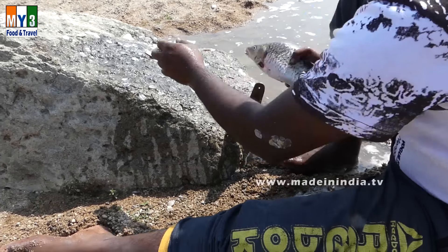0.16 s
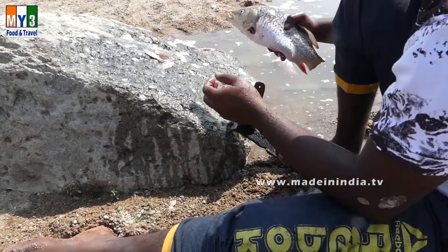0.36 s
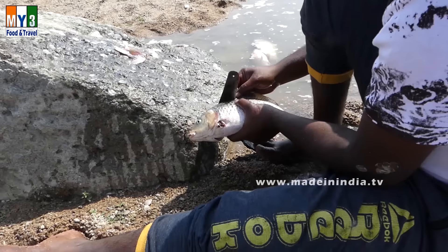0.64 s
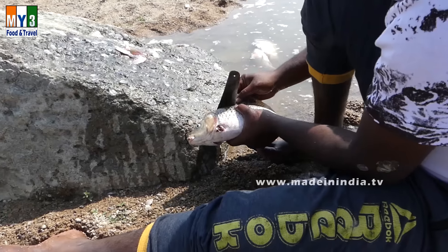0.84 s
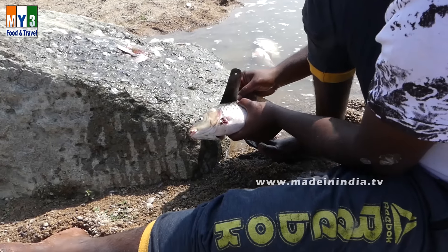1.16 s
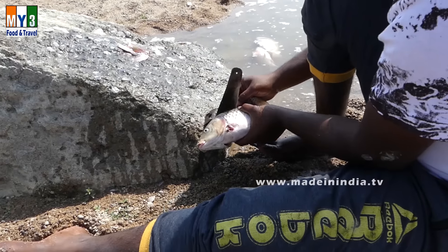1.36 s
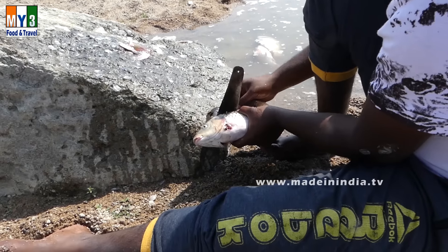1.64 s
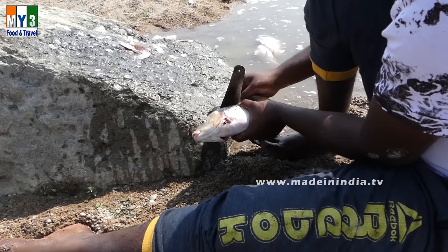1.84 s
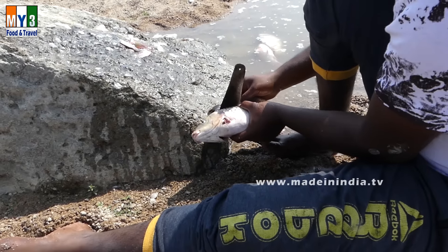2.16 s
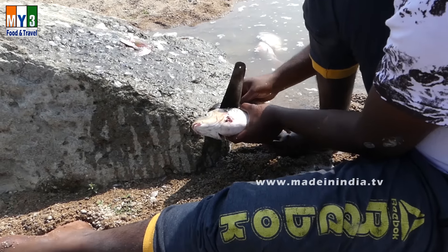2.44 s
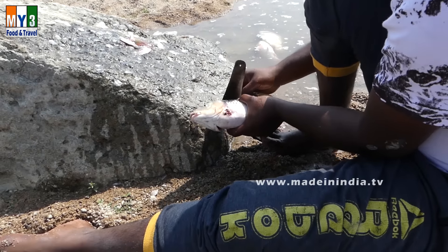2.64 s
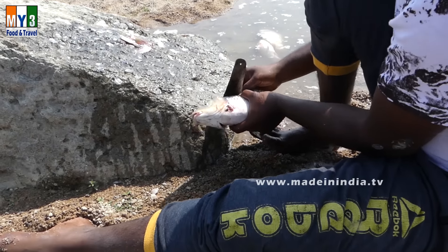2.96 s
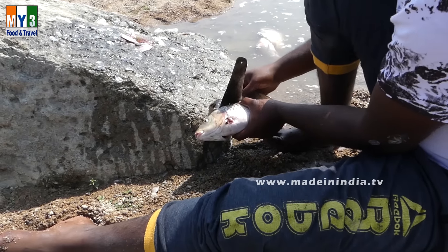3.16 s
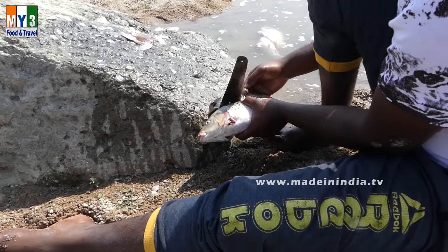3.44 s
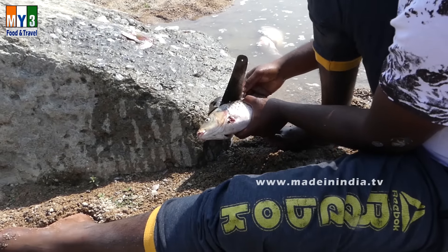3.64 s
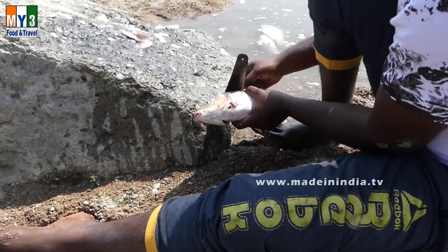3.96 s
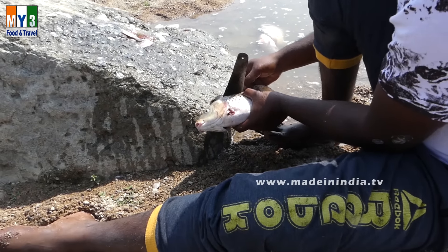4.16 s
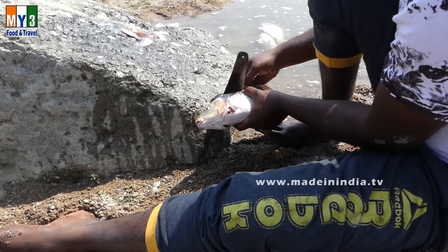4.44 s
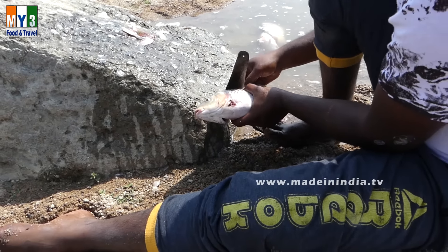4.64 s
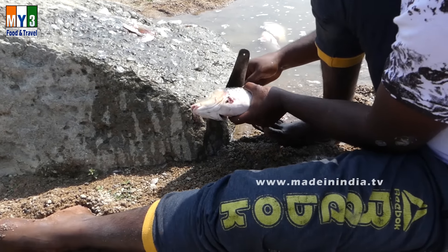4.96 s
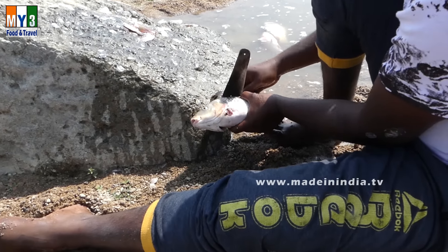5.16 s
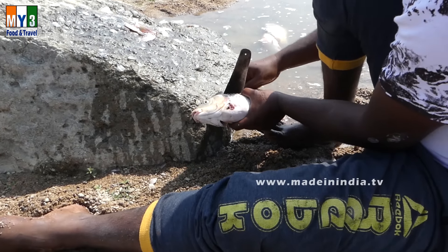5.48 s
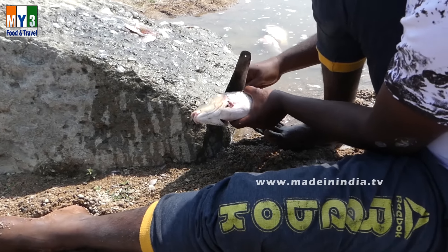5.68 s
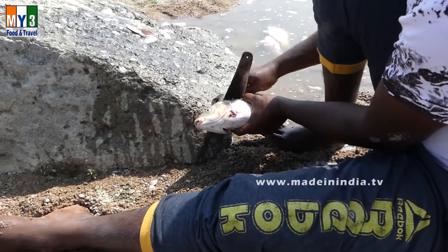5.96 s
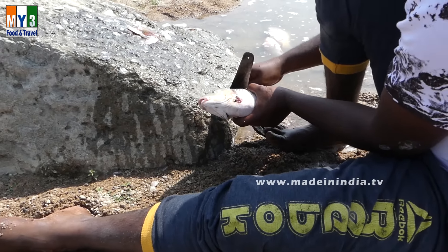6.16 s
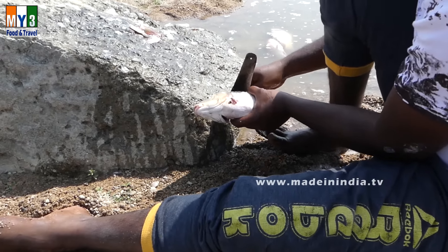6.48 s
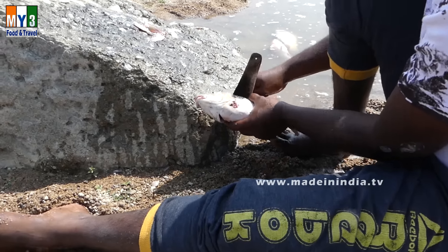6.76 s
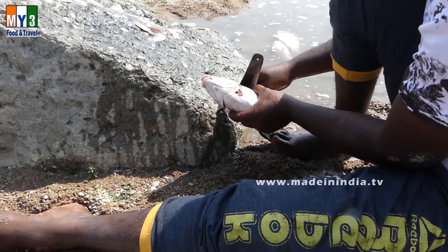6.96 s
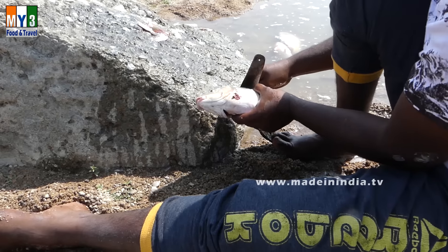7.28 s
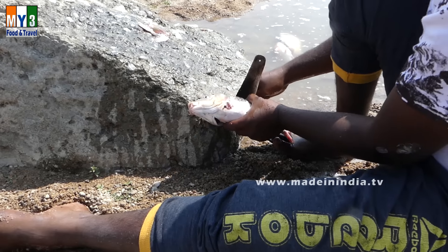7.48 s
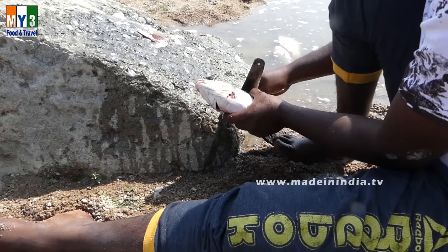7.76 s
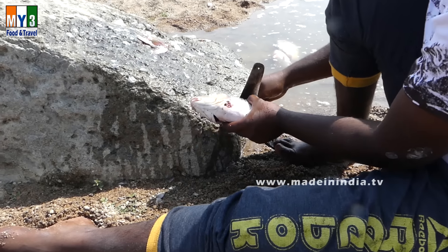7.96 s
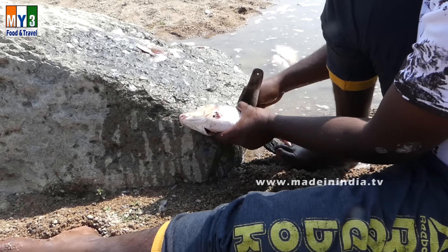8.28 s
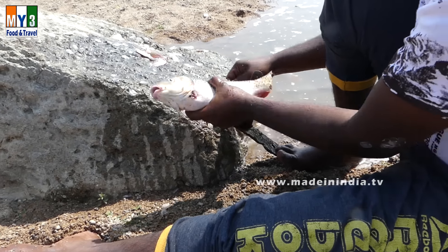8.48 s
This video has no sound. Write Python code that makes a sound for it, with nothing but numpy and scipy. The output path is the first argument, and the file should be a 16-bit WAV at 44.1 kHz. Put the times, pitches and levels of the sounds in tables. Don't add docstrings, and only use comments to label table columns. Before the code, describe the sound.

Outdoors, a low, distant engine throbs steadily under soft air hiss, with faint bird chirps clustered in the first half second and thin rising whistles around 3.5. Close to the microphone, a fish is scraped on steel. From 0 to 1.4 there are only light grazes and a few soft, gritty strokes. From 1.5 to 3.2 dry rasps come about five a second, with brittle scale snaps and small wet pops near 2.1 and 2.4. From 3.2 to 4.7 it is nearly quiet, just faint grazes. Regular scraping returns from 4.8 to 7.3, with more ticks and smacks and a brighter scrape at 7.15. A hard cracking cluster hits at 7.5, another at 7.9, and the loudest at 8.25 to 8.4, with fleshy thuds, a wet smack, a soft low foot slip and brief metallic rings. Rock and ground add a very short echo; a light graze ends it at 8.5.

```python
import sys
import numpy as np
from scipy import signal
from scipy.fft import rfft, irfft, next_fast_len
from scipy.io import wavfile
from scipy.ndimage import uniform_filter1d, map_coordinates

SR = 44100
rng = np.random.default_rng(int(sys.argv[2]) if len(sys.argv) > 2 else 0)


def ratio(d):
    e = np.asarray(d, float) / 20
    return 10 ** e


def store_wav(level_fs):
    pcm = np.round(np.clip(np.atleast_2d(level_fs), -1, 1) * 32767)
    wavfile.write(sys.argv[1], SR, pcm.T.astype(np.int16))


N = 379693
T = np.arange(N) / SR

# time in seconds, engine casing in dB, air in dB.
FAR_LEVELS = [(0.0, -66, -59), (0.84, -60.5, -60.5), (1.7, -63.5, -60), (2.68, -63, -58.5),
              (4.56, -65, -61.5), (5.23, -61.5, -60.5), (8.06, -65, -58), (8.61, -61, -59)]
# frequency in Hz, level in dB per Hz.
ENGINE_TONE = [(15, -77), (25, -80), (70, -14), (78, -15), (108, -3.5), (216, -9.5), (249, -10),
               (281, -11.5), (408, -19.5), (472, -21), (600, -37), (780, -77), (1320, -120)]
# frequency in Hz, level in dB per Hz.
CASING_TONE = [(500, -30), (690, -5.0), (780, -5), (900, -5.0), (1000, -46), (1300, -34)]
# frequency in Hz, level in dB per Hz.
AIR_TONE = [(120, -25), (200, 0.5), (227, -13.5), (249, -15.5), (278, -9), (416, -7.5), (577, -14.5),
            (848, -14), (2230, -22.5), (2490, -22), (3870, -27), (5090, -27), (15800, -33)]
# frequency in Hz, likeness from -1 to 1.
LIKENESS = [(35, .1), (70, 0.54), (130, 0.78), (290, -0.36), (640, -0.41), (1410, -0.23), (3100, 0.21),
            (6820, 0.63), (15000, 0.51)]
# start in seconds, length in seconds, first pitch in Hz, last pitch in Hz, level in dB.
BIRD_NOTES = [
    (.54, .36, 1000, 1255, -64.5),
    (3.5, .6, 3350, 3530, -66),
    (3.56, .42, 2830, 2890, -70),
    (3.55, .5, 4430, 4510, -74),
    (.1, .1, 1950, 1850, -65),
    (3.44, .13, 3080, 2990, -69),
    (2.57, .14, 3000, 2960, -68),
    (8.11, .08, 3000, 3100, -66),
    (4.03, .15, 3520, 3480, -72),
    (3.2, .12, 3000, 3020, -71),
]
# time in seconds, pitch in Hz, level in dB, sweep in Hz per second,
# half length in seconds.
CHIRPS = [(.305, 3480, -64, 0, .012), (.415, 3570, -64, 3000, .012), (.465, 2780, -63, -12000, .01),
          (.49, 3720, -66, 0, .01), (.425, 4120, -67, 5000, .01), (0.17, 1780, -61, -5000, .01),
          (.345, 1850, -66, 3000, .02), (5.528, 4350, -57, 80000, .009), (5.537, 4900, -60, 8000, .005),
          (3.985, 3220, -63, 10500, .035), (3.7, 3430, -63, -6000, .015), (3.775, 3200, -67, -6000, .012),
          (4.05, 4400, -68, 0, .025), (.065, 3200, -68, 0, .012), (0.15, 3080, -68, 0, .01),
          (.12, 3800, -67, 0, .01), (0.33, 3280, -71, 2000, .025), (.27, 1350, -66, 1000, .03),
          (.38, 1250, -66, -2000, .02), (.31, 2150, -68, 0, .012)]

# time in seconds, peak in dB, pitch in Hz.
SMACKS = [(2.1211, -34.5, 1640), (2.366, -37, 800), (5.2714, -39.5, 1640), (5.624, -35, 1650),
          (6.4434, -37, 1630), (6.945, -37, 800), (7.061, -41, 1670), (7.195, -30, 1650),
          (7.466, -42, 1450), (7.573, -38, 1510), (8.325, -27.5, 1660)]
# time in seconds, peak in dB.
FOOT_SLIPS = [
    (8.29, -36.5),
    (8.41, -43),
    (8.15, -47),
]

# frequency in Hz, width in Hz, height over the broad colour in dB.
BODY_MODES = [(572, 350, 8), (827, 85, 10)]
# frequency in Hz, width in Hz, height over the broad colour in dB.
BLADE_MODES = [(2330, 770, 3.5), (3093, 33, 0.76), (4610, 210, 3.5), (5460, 840, 4.7), (6320, 310, 2),
               (7350, 130, 4), (9520, 44, 3), (9750, 64, 4), (11000, 130, 4.5), (11680, 120, 6),
               (14400, 300, 6.3)]
# frequency in Hz, level in dB per Hz.
BODY_TONE = [(200, -35), (380, -3.5), (450, -0.5), (900, -4.5), (1200, -3), (1800, -27), (5000, -41)]
# frequency in Hz, level in dB per Hz.
FLEX_TONE = [(700, -39), (1100, 1.5), (2000, -1.5), (3300, -2.5), (4200, -12.5), (9000, -20.5)]
# frequency in Hz, level in dB per Hz.
FACE_TONE = [(100, -40), (350, -10), (2800, -10), (3800, 3), (6000, -3), (7400, -6), (9000, -17.5)]
# frequency in Hz, level in dB per Hz.
EDGE_TONE = [(100, -38), (400, -12), (3500, -9.5), (6500, -5.5), (8200, -2), (9500, 1.5), (12000, 0),
             (15000, -10), (16500, -24)]
# frequency in Hz, level in dB per Hz.
TIP_TONE = [(200, -45), (9000, -28.5), (10500, 1), (12000, 5.5), (14500, -3), (16000, -14)]

# start in seconds, length in seconds,
# rasp in dB, lean in dB.
STROKES = [(.546, .133, -78, -11), (.655, 0.16, -58, 1.5), (1.462, .07, -63, 6.5), (1.673, 0.11, -50, 3.5),
           (1.869, 0.083, -53.5, 0), (2.029, 0.09, -49, 3), (2.222, 0.092, -55, 3), (2.395, .088, -53, 3),
           (2.555, 0.1, -57, 5), (2.756, 0.078, -51.5, 1), (3.121, 0.095, -53, 3), (3.857, 0.26, -66.5, 0),
           (4.789, 0.11, -54, 2.5), (4.987, 0.12, -58, 4), (5.173, 0.1, -54, 3), (5.729, 0.11, -56.5, 3),
           (5.977, 0.076, -54, 0), (6.136, .093, -56.5, 2.5), (6.359, .087, -51, 2),
           (6.537, 0.08, -55.5, 2), (6.647, 0.24, -55, 2), (6.755, 0.068, -56, 7.5),
           (6.923, 0.098, -54, 4.5), (7.139, 0.044, -41, 1), (7.297, 0.099, -50, 5)]
# start in seconds, length in seconds,
# rasp in dB, lean in dB.
SWELLS = [
    (.965, 0.11, -57.5, 3),
    (1.173, 0.17, -53.5, 4),
    (2.905, 0.11, -58.5, 5),
    (5.371, 0.11, -58.5, 2.5),
    (5.553, 0.085, -54, 2),
    (7.68, 0.088, -49, 6),
]
# start in seconds, length in seconds, rasp in dB, lean in dB.
CUTS = [
    (7.485, .11, -42, 0.5),
    (7.891, 0.089, -44, 2),
    (8.045, 0.063, -44.5, 10.5),
    (8.085, 0.072, -53.5, 19),
    (8.196, .038, -61, 14),
    (8.238, 0.042, -37, 7.5),
    (8.276, 0.052, -38, 4.5),
    (8.321, 0.057, -49, -1),
    (8.398, 0.059, -46, 0),
]
# start in seconds, length in seconds, rasp in dB, lean in dB.
GRAZES = [(.02, 0.041, -62, -2), (.104, .036, -68, 3), (.782, 0.12, -65, 3), (.843, .025, -58.5, 9.5),
          (1.326, 0.031, -57, 16.5), (2.324, .075, -62, 6), (2.711, 0.021, -56, -6),
          (3.384, 0.071, -56.5, 4.5), (4.345, 0.09, -66, -4), (5.101, .051, -58, -5),
          (5.471, 0.1, -61.5, 1), (5.919, 0.068, -58.5, 1), (6.604, 0.068, -49, -0.5),
          (7.016, 0.065, -63, 5), (8.506, .032, -59, 0)]
# its table, share of the length spent rising,
# body and edge level against the rasp at no lean in dB.
CONTACT_KINDS = [
    (STROKES, 0.54, -.6),
    (SWELLS, 0.69, -0.75),
    (CUTS, .33, -7),
    (GRAZES, 0.38, -7),
]

# time in seconds, peak in dB, lean in dB.
ON_EDGE = [(.6938, -38, -8), (1.7444, -38, 0), (1.8711, -48, 6), (1.909, -37, -6), (1.921, -38, -17),
           (1.948, -41, -7), (2.805, -34, -3), (1.288, -48, 4), (2.817, -43, -4), (4.794, -51, -4),
           (5.0557, -43, 7), (5.622, -50, -6), (7.1486, -32, -1), (7.164, -40, -2), (7.5294, -28, 8),
           (7.533, -32, 12)]
# time in seconds, peak in dB, lean in dB.
ON_FACE = [(.861, -50, 2), (2.6958, -48, 4), (2.7122, -46, -9), (2.747, -41, 7), (2.7746, -42, -5),
           (4.756, -54, 2), (5.113, -48, -6), (5.124, -50, -4), (5.23, -48, 4), (5.3547, -42.5, 9),
           (5.4919, -48, 7), (5.8365, -48.5, 4), (6.0082, -47, 10), (6.02, -40, -10), (6.3723, -39, 6),
           (6.556, -49, 1), (6.6175, -41, -4), (6.6812, -43, 8), (6.7332, -39, -10), (7.0254, -49, 5),
           (7.4774, -56, 2), (7.4924, -50, 0), (7.9427, -31.5, -6), (7.953, -33.5, -6)]
# time in seconds, peak in dB, lean in dB.
BENDING = [(.0327, -47, -20.5), (.1151, -51.5, -2), (.5684, -52.5, 12), (.9787, -52, 0), (1.3444, -50, 8),
           (1.356, -45.5, 5), (1.6845, -52, 7), (1.708, -42, -6), (2.7227, -42.5, -10), (7.1914, -51, 12),
           (7.3281, -44, 15), (7.5094, -34, 0), (7.5461, -28, 7), (7.5707, -38, -11), (7.674, -53, 12),
           (7.6936, -39, 18), (7.768, -45, 12), (7.894, -31.5, 0), (7.9228, -21, 4.5), (8.0466, -47, -8),
           (8.0588, -34.5, 17.5), (8.2033, -42.5, 14), (8.2114, -41, 9), (8.2276, -34, 2),
           (8.2714, -35, -4), (8.3157, -33, -13), (8.4048, -42, 9)]
# time in seconds, peak in dB, lean in dB.
JOLTING_ALL = [(2.0917, -51, -7), (2.4274, -49.5, 12.5), (3.15, -51, -9), (4.8429, -59, -2),
               (5.182, -62, 7), (5.1987, -42, 7), (7.1583, -32, -1), (7.309, -47, 4), (7.5057, -26.5, -1),
               (7.5174, -38, -9), (7.9121, -23.5, -1), (8.2468, -20.5, -8.5), (8.2877, -26.5, 0),
               (8.2976, -22.5, 6), (8.4175, -36, 1)]
# its table, level into body, flex, face, edge and tip in dB,
# change of those five levels in dB for 1 dB of lean.
SNAP_KINDS = [
    (ON_EDGE, (-13, -38, -31, -2.5, 1.5), (0.77, 1, 1, 0.11, -0.32)),
    (ON_FACE, (-14, -26, 1.5, -8.5, -14), (1, 0.52, 0.14, -0.94, -.9)),
    (BENDING, (-7, 1.5, -26, -11.5, -16), (0.74, 0.14, 0.15, -0.89, -1.1)),
    (JOLTING_ALL, (-0.8, -3.5, -0.5, -0.5, -12), (0.92, -0.15, 0.63, -0.64, -.6)),
]

# frequency in Hz, level in dB, time to fall by 60 dB in seconds.
FREE_RING = [
    (3173, -15, 0.06),
    (4640, -20, 0.046),
    (6420, -22, .05),
    (7350, -28, 0.051),
    (9740, -19, .065),
]
# start in seconds, length in seconds,
# pitch in Hz, level in dB.
HELD_NOTES = [(0.68, .1, 2300, -64), (0.98, 0.11, 2040, -59.5), (0.98, .095, 5500, -63),
              (0.72, 0.12, 5400, -63), (.7, .08, 9450, -63), (.98, .09, 11100, -61), (.98, .09, 11700, -63),
              (.99, .08, 9600, -63), (1.18, .15, 4400, -64), (2.92, .04, 6300, -61), (7.14, .05, 4300, -49),
              (3.14, .05, 11700, -62), (1.22, .12, 1970, -58.5), (1.19, .13, 5400, -62),
              (1.27, .08, 2460, -60), (3.14, .07, 2100, -59), (5.56, .07, 2760, -59),
              (5.57, 0.065, 4800, -58), (7.15, 0.039, 2250, -49), (7.31, 0.086, 2100, -55),
              (7.7, .07, 2400, -54), (8.058, .04, 2600, -47), (8.095, 0.047, 2350, -50),
              (8.06, 0.083, 950, -46.5), (8.065, .03, 11400, -52.5), (6.6, .2, 5400, -59),
              (2.4, .08, 5500, -60)]
# time in seconds, pitch in Hz, level in dB,
# time to fall by 60 dB in seconds.
PINGS = [(8.2467, 9706, -31, .058), (8.2467, 8600, -38, .08), (8.2467, 2000, -34, .06),
         (7.5056, 2420, -33, .04), (7.953, 9550, -44, .05), (7.9228, 2514, -35, .05),
         (8.4174, 3170, -41, .06), (8.4174, 3700, -46, .04), (8.2976, 11050, -36, .03),
         (8.3157, 9400, -41, .06), (8.335, 1750, -40, .02), (5.325, 6450, -53, .04),
         (5.45, 4600, -48, 0.016), (5.462, 5500, -46, .015), (5.481, 5500, -51, .02),
         (8.1, 1500, -42, .012), (8.139, 1200, -44, .012), (7.581, 5500, -46, .012),
         (5.215, 11050, -47, .06), (5.11, 13500, -52, .04), (.862, 5100, -48, .015),
         (8.2976, 566, -32, .04), (7.193, 11000, -48, .012), (7.672, 11000, -50, .012)]


def unit(x):
    return x / np.sqrt(np.mean(x ** 2) + 1e-20)


def along(points, hz):
    f, v = np.transpose(points)
    return np.interp(np.log(hz + 1), np.log(f + 1), v, left=v[0], right=v[-1])


def wobble(rate):
    knots = rng.standard_normal(int(N * rate / SR) + 4)
    return map_coordinates(knots, [T * rate])


def filtered(x, response):
    m = next_fast_len(N + SR // 2)
    return irfft(rfft(x, m) * response(np.fft.rfftfreq(m, 1 / SR)), m)[..., :N]


def patches(x, patchy_db, tall, long):
    z = signal.stft(x, nperseg=512)[2]
    field = rng.standard_normal(z.shape[1:])
    field = uniform_filter1d(field, size=tall, axis=0)
    field = uniform_filter1d(field, size=long, axis=1)
    gain = ratio(patchy_db * unit(field))
    return signal.istft(z * unit(gain), nperseg=512)[1][:, :N]


def spread(pair, spectrum):
    def shares(hz):
        turn = np.arccos(np.clip(along(LIKENESS, hz), -1, 1)) / 2
        return ratio(along(spectrum, hz)) * [np.cos(turn), np.sin(turn)]

    mid, side = filtered(pair, shares)
    return unit(np.array([mid + side, mid - side]))


def air():
    noise = patches(rng.standard_normal((2, N)), patchy_db=0.86, tall=6, long=12)
    return spread(noise, AIR_TONE)


def engine():
    firing_hz = 19.3
    turns = np.cumsum(firing_hz * (1 + .012 * wobble(.7) + 0.01536 * wobble(12))) / SR
    firings = np.diff(np.floor(turns), prepend=0) * ratio(1.1 * wobble(25))
    echoes = rng.standard_normal((2, 3000)) * ratio(-60 * T[:3000] / 0.1)
    beat = signal.fftconvolve(firings[None], echoes, axes=1)[:, :N]
    throb = 1 + 0.21 * np.cos(2 * np.pi * turns)
    roar = rng.standard_normal((2, N)) * throb
    rumble = spread(roar + 0.88 * unit(beat + 0.77 * beat[:1]), ENGINE_TONE)
    casing = spread(rng.standard_normal((2, N)) * throb, CASING_TONE)
    return rumble * ratio(.4 * wobble(3)), casing * ratio(1.5 * wobble(5))


def birds():
    rise, fall, fade_db, glide = .3, .2, 10, .2
    out = np.zeros(N)
    for s, length, first_hz, last_hz, db in BIRD_NOTES:
        u = (T - s) / length
        hz = last_hz + (first_hz - last_hz) * np.exp(-np.clip(u, 0, 1) / glide)
        phase = 2 * np.pi * np.cumsum(hz + 26 * wobble(12) + 30 * wobble(40)) / SR
        shape_db = np.interp(u, [0, rise, 1 - fall, 1], [-fade_db, 0, 0, -fade_db], -150, -150)
        out += ratio(db - .5 + shape_db + 3.2 * wobble(30)) * np.sin(phase)
    for s, hz, db, sweep, half in CHIRPS:
        t = T - s
        out += ratio(db) * np.exp(-(t / half) ** 2) * np.sin(2 * np.pi * t * (hz + sweep * t / 2))
    return out


def foot_slips():
    out, t = np.zeros(N + SR), T[:4000]
    for s, db in FOOT_SLIPS:
        shape = (t / .014 * np.exp(1 - t / .014)) ** 2
        out[round(s * SR):][:len(t)] += ratio(db) * shape * np.sin(2 * np.pi * 80 * t)
    return out[:N]


def smacks():
    swell_s, rises = .0012, 12
    out, t = np.zeros(N + SR), T[:4000]
    shape = t / swell_s * np.exp(1 - t / swell_s)
    for s, db, hz in SMACKS:
        note = np.sin(2 * np.pi * hz * t * (0.934 + rises * t))
        out[round(s * SR):][:len(t)] += ratio(db - 5.5) * shape * note
    return out[:N]


def friction(grain_db, rate):
    lifts = (rng.random(N) < rate / SR) * ratio(grain_db * np.minimum(rng.exponential(size=N), 2))
    life = ratio(-60 * T[:400] / 0.0047)
    grains = 1 + np.convolve(lifts, life)[:N]
    return unit(rng.standard_normal(N) * grains * ratio(1.17 * wobble(60)))


def ringing():
    ring_grows = .85
    out, t = np.zeros(N + SR), T[:6000]
    hz, level_db, t60 = np.transpose(FREE_RING)[:, :, None]
    for s, db, lean_db in JOLTING_ALL:
        chance_db = 2.5 * rng.standard_normal(hz.shape)
        fade = ratio(ring_grows * db + level_db + chance_db - 60 * t / t60)
        modes = fade * np.sin(2 * np.pi * hz * t)
        out[round(s * SR):][:len(t)] += modes.sum(axis=0)
    return out[:N]


def singing():
    width_hz = 280
    out, force = np.zeros(N + SR), friction(grain_db=4, rate=150)
    for s, length, hz, db in HELD_NOTES:
        t = T[:int(length * SR)]
        mode = np.exp(-np.pi * width_hz * T[:600]) * np.sin(2 * np.pi * hz * T[:600])
        tone = np.convolve(force[round(s * SR):][:len(t)], mode)[:len(t)]
        swell = np.abs(np.sin(np.pi * t / length)) ** .6
        out[round(s * SR):][:len(t)] += ratio(db) * unit(tone) * swell
    t = T[:5000]
    for s, hz, db, t60 in PINGS:
        fade = ratio(db - 60 * t / t60) * (1 - np.exp(-t / .0006))
        out[round(s * SR):][:len(t)] += fade * np.sin(2 * np.pi * hz * t)
    return out[:N]


def scratches():
    per_s, scratch_db, t60_s = 110, 5, 0.0057
    size_db = scratch_db * np.minimum(rng.exponential(size=N), 2) - 3.5
    lifts = (rng.random(N) < per_s / SR) * ratio(size_db)
    life = ratio(-60 * T[:400] / t60_s)
    return unit((1 + np.convolve(lifts, life)[:N]) * ratio(1.44 * wobble(45)))


def knock_response(tone, modes, ring_db):
    hz = np.fft.rfftfreq(8192, 1 / SR)
    bumps = sum(ratio(db + ring_db) / (1 + (2 * (hz - c) / w) ** 2) for c, w, db in modes)
    cep = irfft(np.log(ratio(along(tone, hz)) * (1 + bumps) + 1e-6))
    cep[1:len(hz) - 1] *= 2
    cep[len(hz):] = 0
    h = irfft(np.exp(rfft(cep)))[:len(hz)]
    return h / np.linalg.norm(h)


def radiate(forces, ring_db):
    pairs = [(BODY_TONE, BODY_MODES), (FLEX_TONE, BLADE_MODES), (FACE_TONE, BLADE_MODES),
             (EDGE_TONE, BLADE_MODES), (TIP_TONE, BLADE_MODES)]
    responses = [knock_response(*pair, ring_db) for pair in pairs]
    return signal.fftconvolve(forces, responses, axes=1)[:, :N]


def rubbing():
    press = np.zeros((5, N))
    for rows, rising, sides_db in CONTACT_KINDS:
        for s, length, db, lean_db in rows:
            near = slice(max(0, int(s * SR) - SR // 10), int(s * SR) + SR // 2)
            reach = np.interp(T[near], [s, s + rising * length, s + length], [0, 1, 0])
            body_db, edge_db = sides_db + lean_db, sides_db - lean_db
            shares_db = np.array([body_db - 2.0, 0.51 * body_db - 5.5, 0.5 * edge_db - .6,
                                  edge_db - 1.0, edge_db - .6 * lean_db - 7])
            press[:, near] += ratio(db + 1.0 + shares_db)[:, None] * np.sin(reach * np.pi / 2) ** 0.78
    forces = np.array([friction(grain_db=3.5, rate=220) for part in press])
    forces = patches(forces, patchy_db=2.32, tall=9, long=6) * scratches()
    return radiate(press * forces, ring_db=-1.5)


def snapping():
    snap, t = np.zeros((5, N + SR)), T[:1500]
    for rows, parts_db, leaning in SNAP_KINDS:
        for s, db, lean_db in rows:
            burst = rng.standard_normal(len(t)) * (ratio(-60 * t / 0.01) + 0.2 * ratio(-60 * t / 0.04))
            burst = burst / np.linalg.norm(burst)
            burst[0] = 0.58
            shares_db = np.add(parts_db, np.multiply(leaning, lean_db))
            snap[:, round(s * SR):][:, :len(t)] += ratio(db + 15 + shares_db)[:, None] * burst
    return radiate(snap[:, :N], ring_db=0.0)


def ground_echo(near):
    tail = rng.standard_normal((2, 2500)) * ratio(-60 * T[:2500] / .03)
    tail = np.diff(tail, prepend=0) + 1.0 * tail
    return ratio(-5.5) * signal.fftconvolve(near, tail / np.linalg.norm(tail[0]), axes=1)[:, :N]


def scene():
    times, *levels = np.transpose(FAR_LEVELS)
    drone_db, air_db = (np.interp(T, times, level) for level in levels)
    rumble, casing = engine()
    motor = ratio(-53 + 4.0) * rumble * ratio([[-1.1], [1.1]]) + ratio(drone_db + 4.0) * casing
    far = motor + ratio(air_db + 6.5) * air()
    body, flex, face, edge, tip = rubbing() + snapping()
    blade = flex + face + smacks() + foot_slips() + ringing()
    near = body * ratio([[-.8], [.8]]) + blade * ratio([[-.6], [.6]])
    near = near + (edge + tip) * ratio([[.2], [-.2]]) + singing() * ratio([[-.5], [.5]])
    return near + ground_echo(near) + far * ratio([[-.3], [.3]]) + birds() * ratio([[-1.5], [1.5]])


def top_cut(x):
    return signal.sosfilt(signal.butter(12, 16830, fs=SR, output="sos"), x)


def record(dry):
    def response(hz):
        narrow = .8 / (1 + ((hz - 7580) / 50) ** 2)
        wide = .15 / (1 + ((hz - 7900) / 500) ** 2)
        top_hz = 15720
        top = (hz < top_hz) + ratio(-35) * (hz >= top_hz) * (hz < top_hz + 800)
        return (1 - narrow - wide) * top

    return top_cut(filtered(dry, response))


dry = scene()
out = record(dry)
store_wav(out)
```